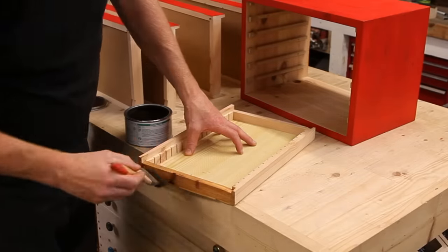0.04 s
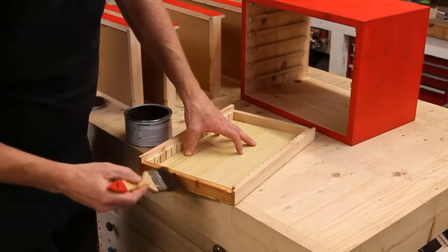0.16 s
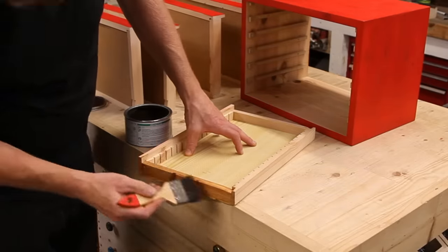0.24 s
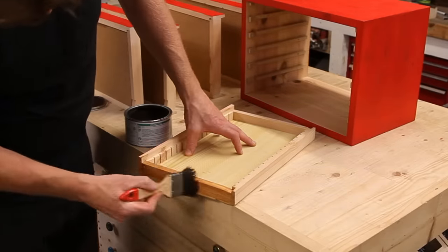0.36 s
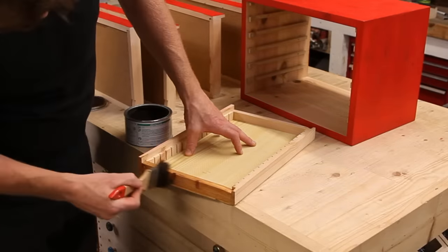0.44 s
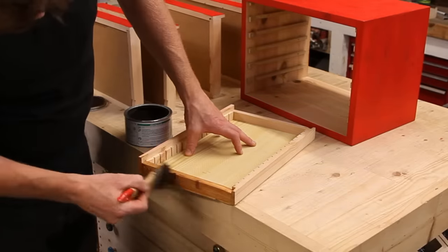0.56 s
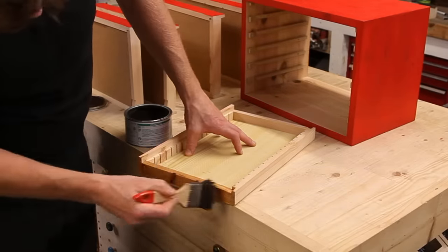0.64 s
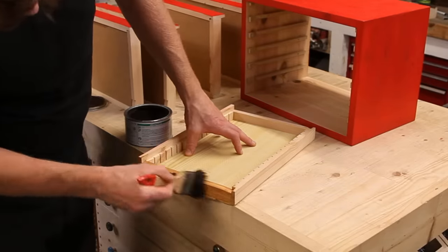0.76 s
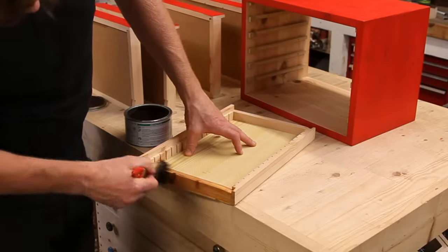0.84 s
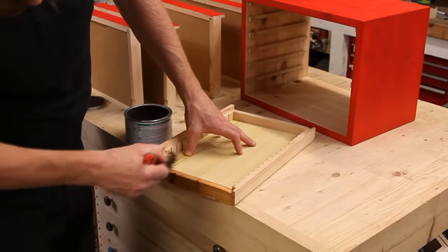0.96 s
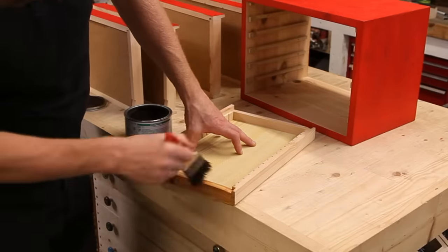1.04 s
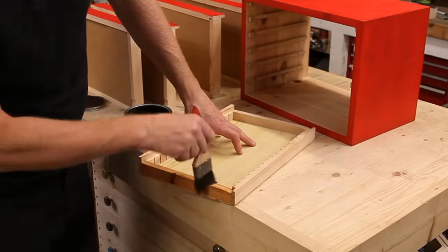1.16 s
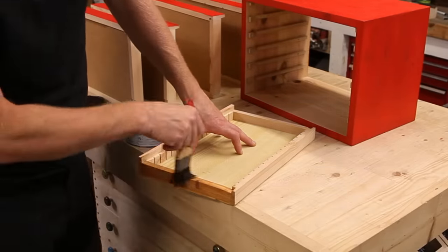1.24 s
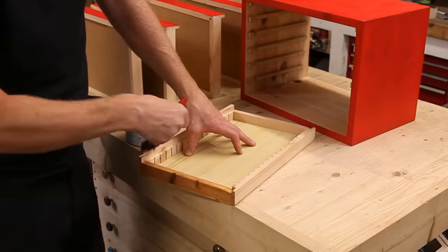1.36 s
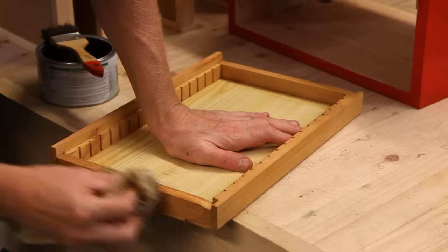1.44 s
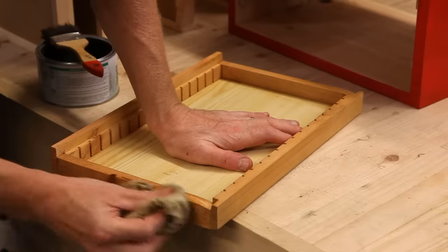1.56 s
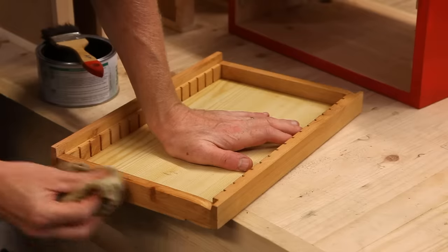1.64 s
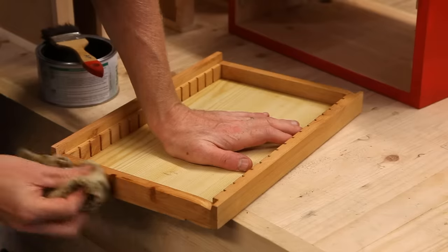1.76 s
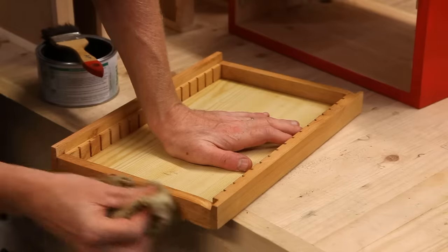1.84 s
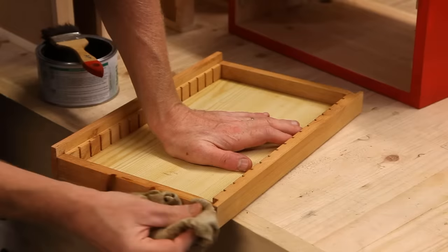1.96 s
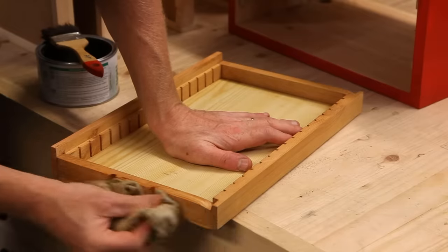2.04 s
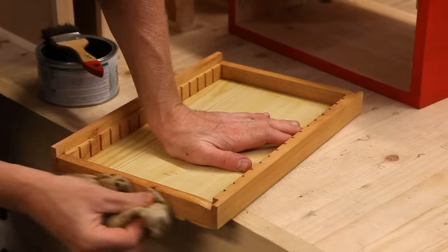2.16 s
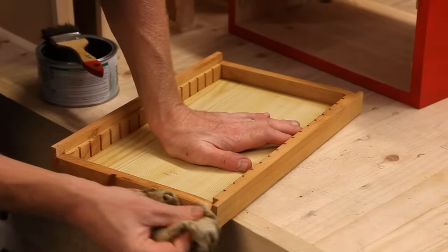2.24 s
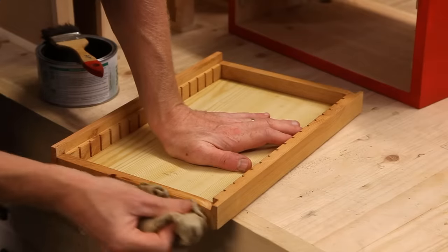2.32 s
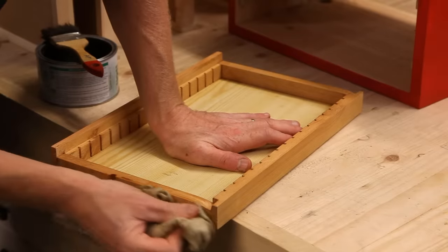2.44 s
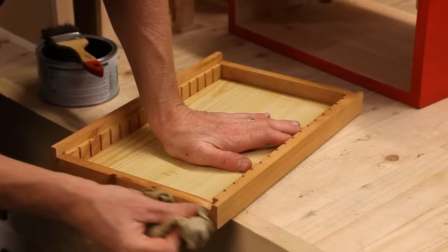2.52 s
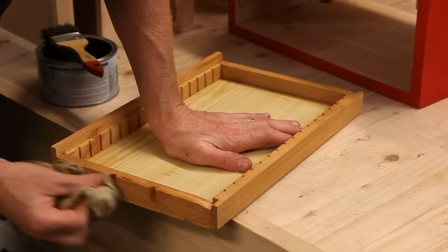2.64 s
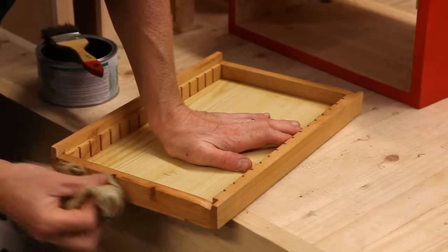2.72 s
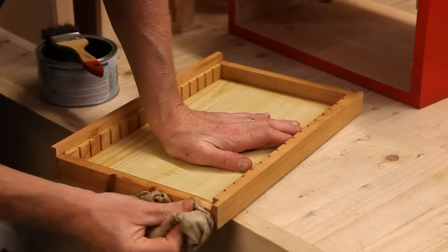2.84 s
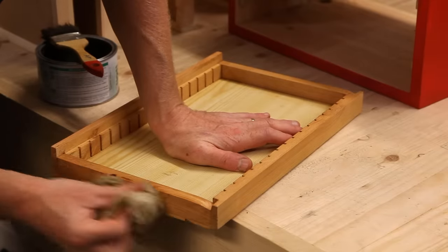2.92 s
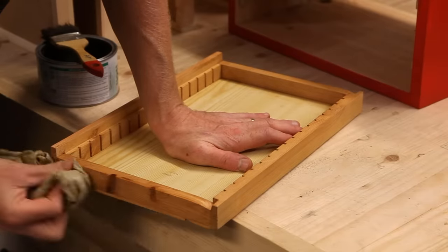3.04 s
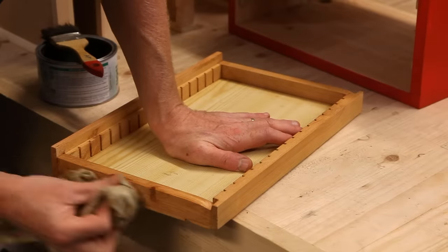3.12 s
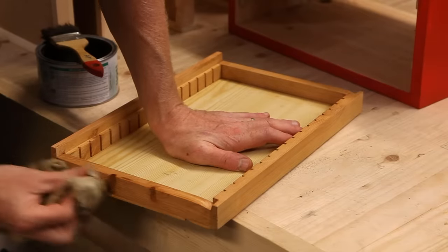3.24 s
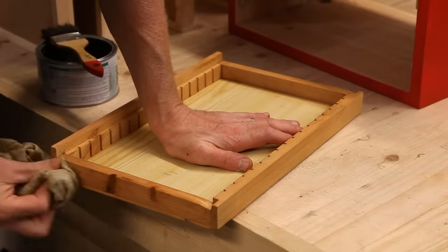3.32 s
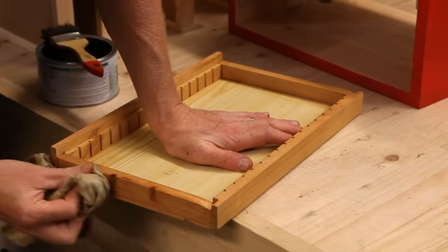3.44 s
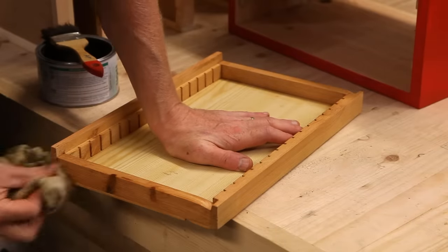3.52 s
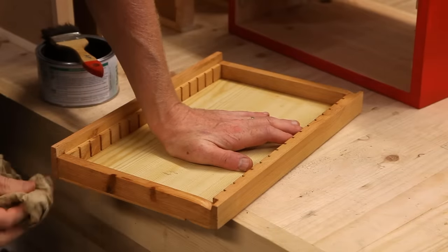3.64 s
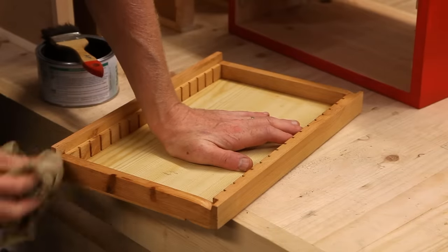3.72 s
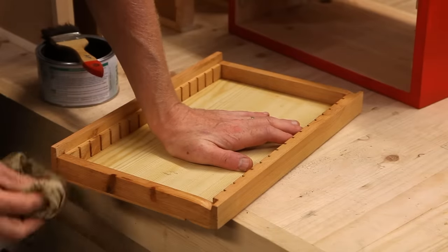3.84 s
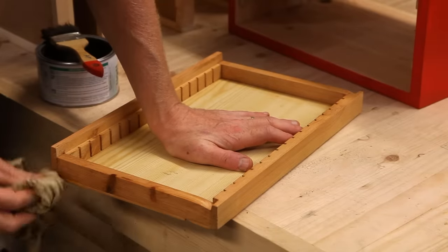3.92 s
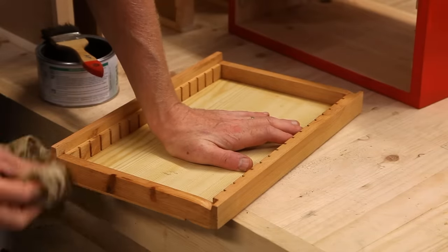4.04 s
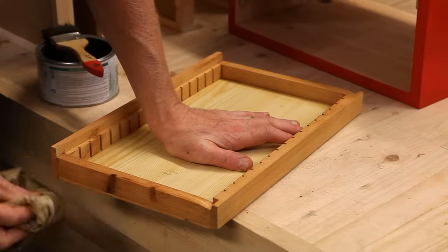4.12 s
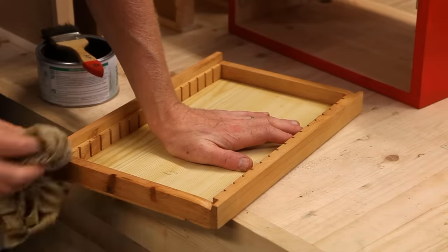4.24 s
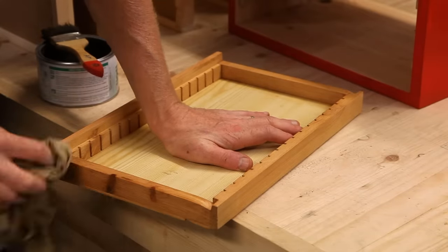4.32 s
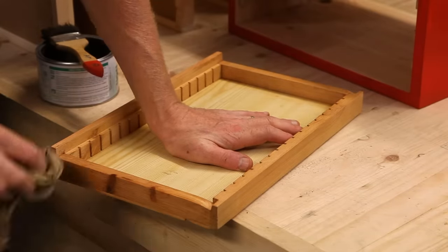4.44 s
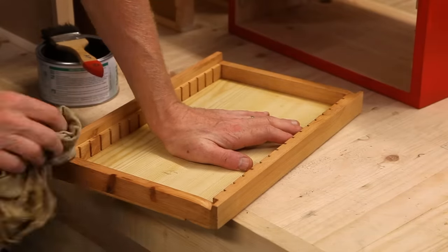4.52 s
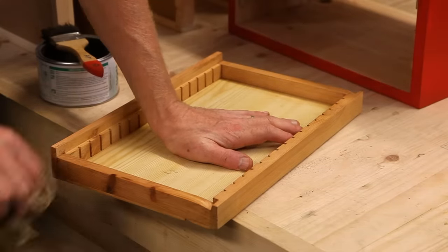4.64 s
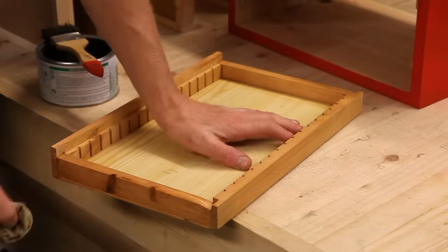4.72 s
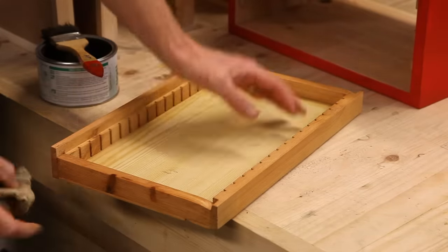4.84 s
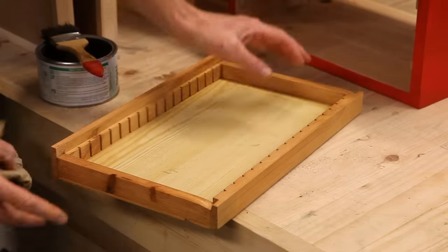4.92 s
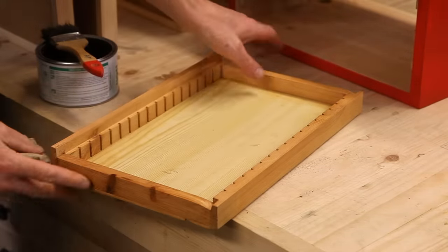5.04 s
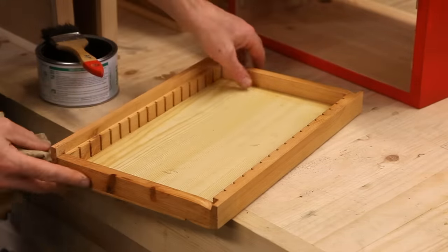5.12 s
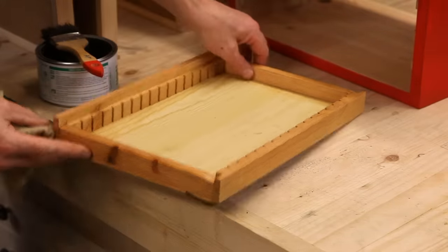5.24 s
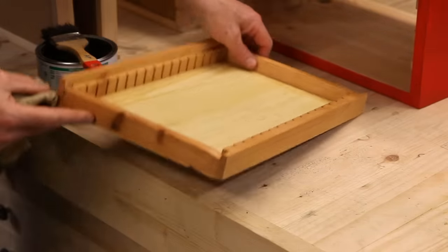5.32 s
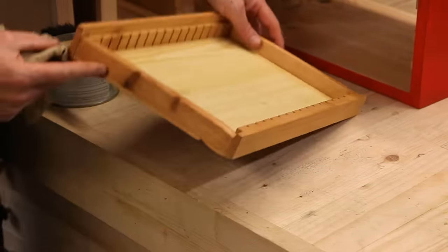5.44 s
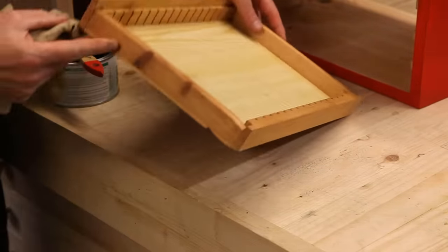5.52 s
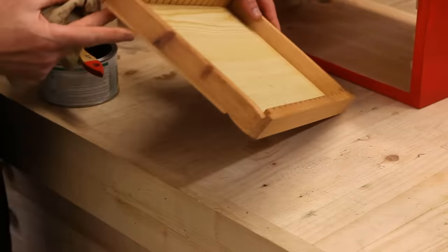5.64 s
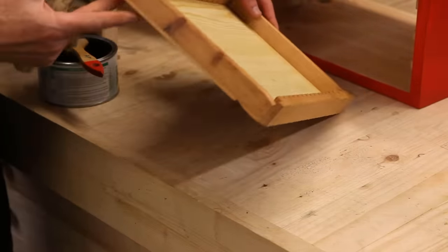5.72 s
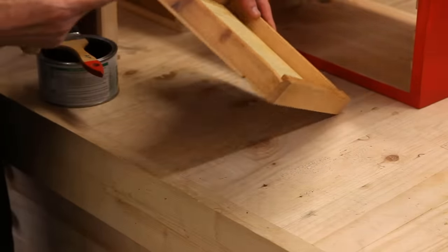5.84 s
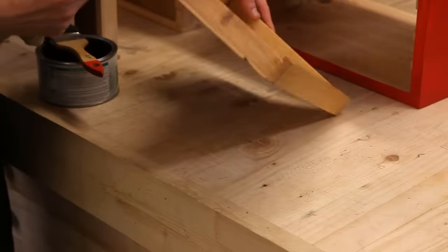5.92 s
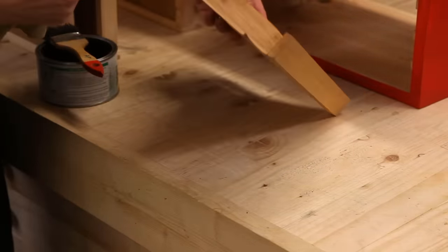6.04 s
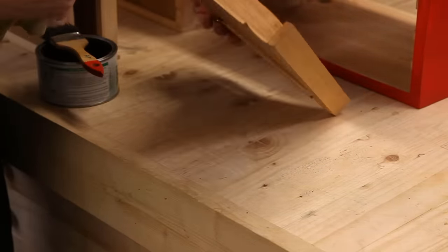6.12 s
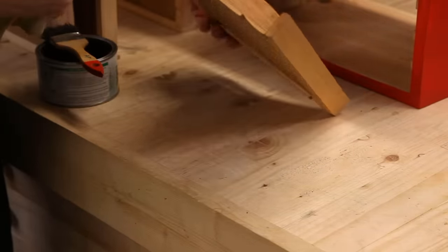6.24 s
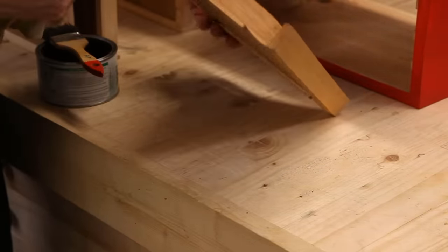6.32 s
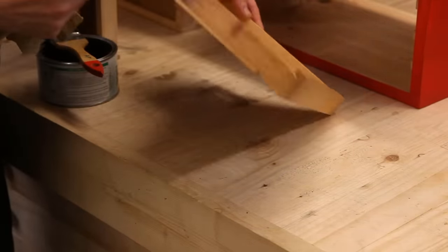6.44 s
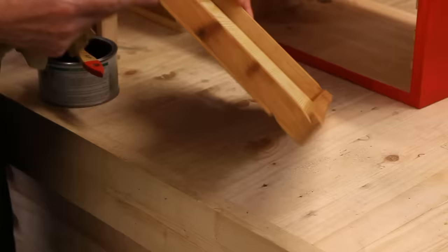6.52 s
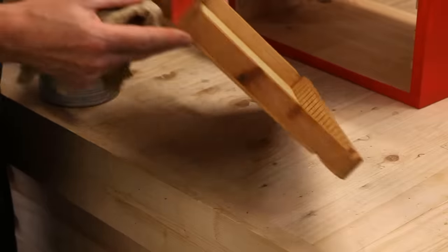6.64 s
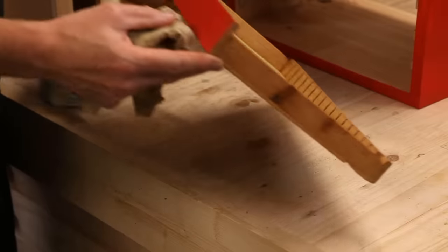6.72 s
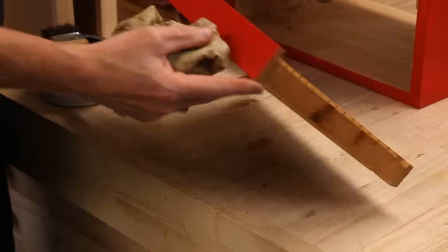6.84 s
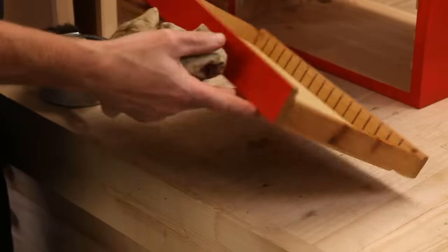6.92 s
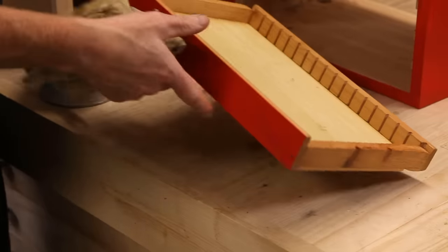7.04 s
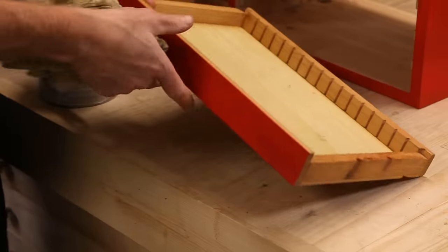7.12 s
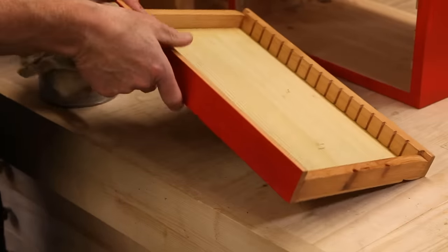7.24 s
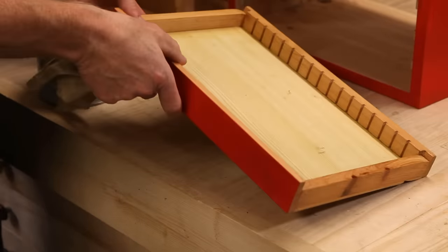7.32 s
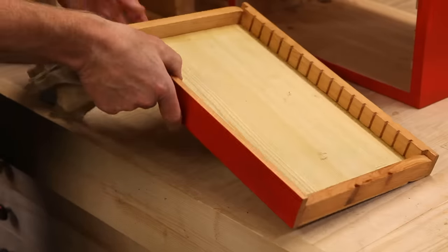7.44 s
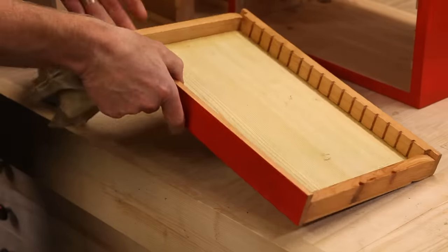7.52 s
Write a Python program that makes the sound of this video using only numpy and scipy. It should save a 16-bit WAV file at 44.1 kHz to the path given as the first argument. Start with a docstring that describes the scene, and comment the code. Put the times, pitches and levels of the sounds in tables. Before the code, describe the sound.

Soft brush strokes whisper on a small wooden drawer, then a rag rubs it in quick hissy strokes, with sharp knocks as it is turned over.

```python
"""Soft brush strokes hiss on a small wooden drawer, then a rag rubs it in quick strokes, among many knocks.
Later it is slid, lifted, turned and set down on its workbench. The hiss is filtered noise for fibres on
the grain; the same kind of rubbing noise shakes the side wall and bottom panel through their resonances.
Each knock is a bright crack that rings the same wood, and the bench groans low in narrow bands of noise.
A workshop adds echoes and a steady background, and one mono microphone picks it all up."""
import sys
import numpy as np
from scipy import signal
from scipy.fft import rfft, irfft
from scipy.io import wavfile
from scipy.ndimage import uniform_filter1d

SR = 44100
rng = np.random.default_rng(int(sys.argv[2]) if len(sys.argv) > 2 else 0)


def bounce(signal):
    """Save signal as a 16-bit WAV file at the path given by the first command-line argument."""
    frames = np.transpose(np.atleast_2d(signal))
    limited = np.clip(frames, -1, 1)
    pcm = np.round(limited * 32767).astype(np.int16)
    wavfile.write(sys.argv[1], SR, pcm)


N = 334278  # length in samples

# Moments when the hands change their hold on the drawer. Each entry: time in seconds.
GRIP_TIMES = [1.44, 4.27, 5.1, 6.4, 7.15]
PANEL_TOP_HZ, WALL_TOP_HZ = 900, 2700  # panel modes lie below the first, wall modes between the two


def undb(db):
    """Turns decibels into a plain gain."""
    return 10 ** (np.asarray(db) / 20)


def level(x, db):
    """Scales a sound to a chosen average (rms) level in dB."""
    return x * undb(db) / np.sqrt(np.mean(x ** 2))


def band(x, hz, *widths_hz):
    """Passes sound through one resonance per width, each with gain 1 at the centre."""
    for width_hz in widths_hz:
        x = signal.lfilter(*signal.iirpeak(hz, hz / width_hz, fs=SR), x)
    return x


def walk(rate):
    """Random wandering with spread 1: values held for 1 / rate seconds, then smoothed."""
    hold = int(SR / rate)
    steps = np.repeat(rng.standard_normal(N // hold + 1), hold)
    return level(uniform_filter1d(steps, hold)[:N], 0)


def rubbing():
    """Fibres stick and slip on the grain: we hear their hiss, and the wood that the rubbing shakes."""
    # Broad bands of the fibre hiss. Each row: centre in Hz, width in Hz, relative level in dB.
    hiss_bands = [(5270, 3200, -8), (7380, 3200, 0.5), (2960, 3530, -6), (13170, 3600, -5)]
    on_fibres, on_wall, on_panel = pressure()
    grip = np.searchsorted(GRIP_TIMES, np.arange(N) / SR)
    hiss = np.zeros(N)
    for hz, width_hz, db in hiss_bands:
        scratch = band(slips(2.3, 1.4, 90), hz, width_hz, 2.5 * width_hz)
        hiss += undb(db) * level(scratch, 0)
    drag = level(slips(1.66, 1.5, 60), 0)
    shove = level(slips(2.64, 2.0, 60), 0)

    thin = ring(drag * on_fibres, grip, WALL_TOP_HZ, SR, place_db=2.5)  # highest modes
    wall = ring(drag * on_wall, grip, PANEL_TOP_HZ, WALL_TOP_HZ, place_db=2.0)
    panel = ring(shove * on_panel, grip, 0, PANEL_TOP_HZ, place_db=1.5)
    # the shove also shakes the panel's higher modes around 1000 Hz
    panel = panel + level(band(shove, 1060, 420, 420), -8.0) * on_panel
    # many weak modes merge into a broad rustle between the strong ones
    wall = undb(-6.5) * wall + level(band(drag, 2040, 2400, 2400), -11) * on_wall
    panel = undb(-4.5) * panel + level(band(shove, 420, 1040, 1040), -12) * on_panel
    return level(hiss, -0.96) * on_fibres + undb(-1.0) * thin + wall + panel


def pressure():
    """Gains on fibres, wall and panel: each contact lands, presses down, travels, lifts and fades."""
    # Brush strokes, rag strokes, and drawer or fingers sliding on wood. Each row: start in seconds, length
    # in seconds, hiss gain in dB on landing (before the touch shortfall), hiss gain in dB on lifting,
    # side wall in dB compared with the hiss, bottom panel in dB compared with the hiss.
    brush_strokes = [(0.0, 0.085, -48.5, -57, -4, 0), (.312, 0.14, -41.5, -36.5, -4.5, -13),
                     (.724, 0.12, -41.5, -36.5, -5, -13), (1.088, 0.021, -38.5, -38, -6, -21),
                     (1.192, 0.11, -40, -36, -4.5, -16)]
    rag_strokes = [(1.442, 0.07, -33.5, -37, -3.5, -28), (1.56, .15, -38, -35.5, -5, -16),
                   (1.756, .19, -35.5, -34.5, -6, -16), (1.978, 0.047, -35.5, -41, 0, -9),
                   (2.036, 0.071, -31.5, -30, -7, -5), (2.156, 0.13, -32, -32.5, -8.5, -17),
                   (2.327, 0.049, -29.5, -33.5, -5, -8), (2.426, 0.069, -32.5, -35.5, -5, -8),
                   (2.541, 0.13, -29, -30, -10, -13), (2.716, 0.13, -32, -30.5, -8.5, -16),
                   (2.872, .15, -26, -33, -4.5, -10), (3.068, 0.1, -32, -35, -21, -11.5),
                   (3.198, 0.11, -35, -30, -12.5, -16.5), (3.344, .08, -31.5, -37, -13, -10),
                   (3.456, 0.1, -38.5, -27.5, -8, -10.5), (3.606, 0.014, -30, -30.5, -2, -22),
                   (3.713, 0.03, -20.5, -22, -3.5, -8.5), (3.78, 0.08, -33.5, -33, -6, -8),
                   (4.048, 0.026, -25.5, -28, -6, -11), (4.316, 0.038, -38.5, -29, -6, -0.5),
                   (4.588, 0.037, -36.5, -29, -23, -12)]
    wood_slides = [(.522, 0.16, -65.5, -64.5, 1, 21.5), (1.404, 0.029, -48.5, -48.5, -8, 7),
                   (4.28, .02, -42, -48, -9, -10), (4.555, .025, -39, -55, -6, -12),
                   (5.15, .02, -50, -53, -8, -7), (5.174, 0.017, -40.5, -49, 2, -15),
                   (5.336, .24, -45, -48.5, -0.5, -7.5), (6.29, 0.048, -55, -50, -9, -15),
                   (6.416, 0.087, -58, -57.5, 3.5, 4.5), (6.508, 0.045, -45, -45.5, 2.5, -8),
                   (6.6, 0.16, -47, -42, -0.5, -10.5), (6.796, .01, -39.5, -44.5, -10, -2.5),
                   (6.85, 0.092, -49, -50, -1.5, -11), (6.955, 0.032, -43, -42, -5, -28)]
    # Faint rustle of hands and rag between contacts. Each row: time in seconds, hiss gain in dB,
    # side wall in dB compared with the hiss, bottom panel in dB compared with the hiss.
    faint_rustle = [(0.0, -54, -4, 1), (.24, -57, -8, 2), (.6, -72, -4, -3), (1.0, -60.5, -7, -10),
                    (1.39, -57, -2, -10), (1.55, -45, -2, 0), (3.6, -55, 11, -9), (4.0, -48, -5, -5.5),
                    (4.26, -56.5, -1, -13), (4.5, -53, -3.5, -6), (4.67, -42.5, -6, -4),
                    (5.05, -52.5, -4.5, -13), (5.3, -53, -6, -9), (5.75, -62, -1, 2), (6.1, -70, -7, -2.5),
                    (6.4, -63, -2.5, -14), (7.13, -63, -12, -12), (7.24, -48, -2.5, -3),
                    (7.58, -60.5, -5, -12)]
    # Touch of each tool: dB short of full pressure at first, pressing time in s, fade after lifting in dB/s.
    tools = [(brush_strokes, (2.2, 0.022, 280)),
             (rag_strokes, (2.4, 0.01, 570)),
             (wood_slides, (2.8, 0.022, 350))]
    landing_s = 0.006
    fade_share = np.array([[1], [0.63], [0.44]])  # wall and panel fade slower: the wood goes on shaking

    t = np.arange(0, N / SR, 0.001)
    s, hiss_db, wall_db, panel_db = np.transpose(faint_rustle)
    power = np.array([undb(2 * np.interp(t, s, hiss_db + db)) for db in (0, wall_db, panel_db)])
    for rows, (short_db, press_s, fade_db_s) in tools:
        for start, length, land_db, lift_db, wall_db, panel_db in rows:
            since = np.maximum(t - start, 0)
            lifted = np.maximum(since - length, 0)
            db = np.interp(since, [0, length], [land_db, lift_db])
            db = db - short_db * np.exp(-since / press_s)
            db = db + np.array([[0], [wall_db], [panel_db]]) - fade_share * fade_db_s * lifted
            landing = np.clip(1 + (t - start) / landing_s, 0, 1)
            power += undb(2 * db) * landing ** 2
    return [np.interp(np.arange(N) / SR, t, np.sqrt(p)) for p in power]


def slips(scatter_db, flicker_db, rate):
    """Dense stick-slip of many fibres: clicks of uneven size under an unsteady hand."""
    uneven_db = scatter_db * rng.exponential(size=N)
    hand_db = flicker_db * walk(rate)
    return rng.standard_normal(N) * undb(uneven_db + hand_db)


def ring(force, grip, lo_hz, hi_hz, place_db=0):
    """Rings the drawer modes between two frequencies; the grip decides how strongly each can ring."""
    # Natural resonances of the drawer, with the bench shaking low beneath it in the first row. Each row: pitch
    # in Hz, # width in Hz, then the level in dB (rms for a steady push of unit noise) when brushed, pressed
    # under the rag, # dabbed at the corner, tilted up, turned over, set down.
    modes = [(45, 28, -27, -19.5, -33, -25, -30, -33), (96.7, 12, -12.5, -20.5, -9.5, -30, -24, -40),
             (147.4, 36, -16, -17, -9, -20, -24, -11.5), (209.4, 16, -16, -20, -17, -20, -35, -8.5),
             (247, 26, -20, -20.5, -9, -6, -26, -7.5), (319.6, 17.3, -17.5, -8.5, -5, -4.5, -10.5, -13.5),
             (360, 106, -36, -7.5, -10.5, -26, -14, -21), (426, 25, -6.5, -5, -5.5, -5, -12, -13),
             (475.7, 18, -17, -17.5, -7, -10, -30, -13.5), (557, 28, -11.5, -11.5, -14, -3, 1, 1),
             (660, 39, -5.5, -6, -9.5, -7, -9.5, -11), (827, 39, -5, -7, -11, -3.5, -9, -9.5),
             (985, 63, -11.5, -13, -9, -6.5, -10.5, -7), (1196, 125, -13.5, -7.5, -9, -8.5, -12, -5),
             (1524, 54, -16, -13.5, -9, -8, -6.5, -8.5), (1686, 77, -3.5, -5.5, -3, -6.5, -5, -8),
             (2080, 270, -2.5, -4, -6.5, -20, -16, -3), (2110, 117, -26, 0.5, -16, -12, -15, -12.5),
             (2615, 250, -18, -4, -7, -1.5, -1, -6), (2790, 470, -22, -18, -14, -9.5, -10, -28),
             (2974, 41, -19.5, -24, -15, -24, -10, -26), (3670, 220, -15, -23, -23, -18, -12, -21),
             (3946, 170, -10, -19, -19, -20, -12, -24), (4800, 1100, -40, -17, -9.5, -11, -7, -2.5)]
    total = 0
    for k, (hz, width_hz, *grip_db) in enumerate(modes):
        if lo_hz <= hz < hi_hz:
            # a moving contact crosses still points of the mode, so each one swells and fades on its own
            place = undb(place_db * walk(7)[:len(force)])
            push = force * undb(grip_db)[grip] * place
            # the root makes up for the noise power lost in a narrow band; signs alternate
            total = total + (-1) ** k * band(push, hz, width_hz) * np.sqrt(SR / (np.pi * width_hz))
    return total


def top(x):
    """Scales a sound to a peak of 1."""
    return x / np.max(np.abs(x))


def knocks():
    """Each blow: a click with a short bright crack, and a push into the modes of wall and panel."""
    # Blows on the wood. Each row: start in seconds, crack peak in dB, panel ring in dB compared with
    # that peak, side wall ring in dB compared with that peak, crack centre in Hz, then the times in
    # seconds for the crack noise and for the contact noise to fall by 60 dB.
    blows = [(0.3114, -42, -5, -6, 2100, 0.014, 0.046), (0.522, -34.5, -1.5, -10, 3650, 0.0086, 0.024),
             (0.725, -34, -17, -5, 2100, 0.018, 0.034), (0.7692, -38, 1.5, 4, 7460, .015, 0.031),
             (2.0572, -16.5, -6, -4.5, 3950, 0.037, 0.08), (2.5413, -21, -18, -20, 1200, 0.05, 0.042),
             (2.5746, -21, -9.5, -6.5, 5260, 0.012, 0.015), (2.8659, -2, -26.5, -16, 5060, 0.03, 0.049),
             (3.3449, -18, -22, -12, 7510, .015, 0.035), (3.7174, -16, -19, -26, 1580, 0.26, 0.04),
             (4.315, -26, -18, -21, 7290, 0.022, 0.39), (4.6116, -26.5, -0.5, -17, 5900, .02, 0.094),
             (4.7772, -25, -33, -13, 7350, 0.013, 0.027), (5.1725, -40.5, -22, 1, 6650, .02, 0.03),
             (5.8586, -7, -52, -34, 6000, 0.0093, 0.03), (6.508, -35.5, -26, -20, 2900, 0.079, 0.066),
             (6.8108, -44, 3, -10, 4410, .02, 0.066), (7.1564, -8, -9.5, -9, 5360, 0.045, 0.19),
             (7.3096, -27.5, -18, -10, 6000, .03, 0.057), (7.4495, -28.5, -30, -27, 6160, 0.0072, 0.031)]
    out = np.zeros(N + SR)
    t = np.arange(SR // 2) / SR
    grit = rng.standard_normal((len(blows), len(t)))
    for (s, db, panel_db, wall_db, hz, crack_t60, contact_t60), noise in zip(blows, grit):
        grip = np.searchsorted(GRIP_TIMES, s)
        crack = noise * 1000. ** (-t / crack_t60)
        crack[0] = 5.1  # the click
        # uneven contact shares the blow out among the modes
        rattle = noise[::-1] * 1000. ** (-t / contact_t60)
        blow = top(band(crack, hz, 0.99 * hz, 2.0 * hz, 2.85 * hz))
        blow = blow + undb(wall_db) * top(ring(rattle, grip, PANEL_TOP_HZ, WALL_TOP_HZ))
        blow = blow + undb(panel_db) * top(ring(rattle, grip, 0, PANEL_TOP_HZ))
        # the bench top answers dully
        blow = blow + undb(panel_db - 12) * top(band(rattle, 770, 1000, 1000))
        i = int(s * SR)
        out[i:i + len(t)] += undb(db) * blow
    return out[:N]


def bench():
    """Weight shifting on the bench stirs its resonances, sometimes two together, as soft bumps and groans."""
    # Bumps and groans of the bench top. Each row: start in seconds, length in seconds,
    # rms level in dB at full push, pitch in Hz, width in Hz.
    groans = [(0.373, 0.044, -58, 144, 50), (0.798, .04, -55, 144, 50), (1.138, 0.043, -56, 139, 50),
              (2.419, 0.038, -44, 430, 200), (3.552, 0.047, -43.5, 418, 250), (4.293, 0.12, -53, 115, 80),
              (4.586, 0.17, -54, 111, 80), (5.186, 0.037, -56, 120, 60), (5.478, 0.244, -55.5, 241, 40),
              (5.486, .14, -57, 321, 40), (5.95, 0.11, -61, 233, 60), (6.431, 0.087, -56.5, 146, 50),
              (6.848, .05, -59, 690, 60), (7.355, .2, -62.5, 203, 70)]
    edge_s = 0.022  # time to swell in and to die away
    out = np.zeros(N + SR)
    t = np.arange(SR) / SR - 0.5  # starts early to leave room for the swell
    for start, length, db, hz, width_hz in groans:
        push = np.clip(np.minimum(t, length - t) / edge_s + 0.5, 0, 1)
        shake = level(band(rng.standard_normal(SR), hz, width_hz, 2 * width_hz), db)
        i = int(start * SR)
        out[i:i + SR] += push * shake
    return out[SR // 2:SR // 2 + N]


def workshop(x):
    """Two near echoes, and a diffuse tail that swells in and dies a little faster in the treble."""
    # Echoes off bench and cabinet. Each row: delay in seconds, level in dB compared with the direct sound.
    near_echoes = [(.0056, -13), (.0145, -17)]
    tail_db, swell_s = -7, 0.012
    low_t60_s, high_t60_s = 0.39, 0.37  # time to fall by 60 dB
    t = np.arange(int(0.7 * SR)) / SR
    noise = rng.standard_normal(len(t))
    low = signal.lfilter(*signal.butter(2, 1000, fs=SR), noise)
    tail = low * 1000. ** (-t / low_t60_s) + (noise - low) * 1000. ** (-t / high_t60_s)
    tail = tail * (1 - np.exp(-(t / swell_s) ** 2))
    tail = undb(tail_db) * tail / np.sqrt(np.sum(tail ** 2))
    tail[0] = 1  # the direct sound
    for s, db in near_echoes:
        tail[int(s * SR)] += undb(db)
    return signal.fftconvolve(x, tail)[:N]


def room_tone():
    """Steady background of the shop and hiss of the preamp: noise shaped by a smooth spectrum."""
    # Shape of the background. Each row: frequency in Hz, relative level in dB per Hz.
    spectrum = [(12, -37), (20, -8), (162, -5), (496, -9.5), (554, -8.5), (620, -10), (1080, -12),
                (1350, -11.5), (2240, -12.5), (2720, -11), (2960, -12.5), (7860, -13.5), (8550, -18),
                (15800, -23.5)]
    hz, db = np.transpose(spectrum)
    f = np.maximum(np.arange(N // 2 + 1) * SR / N, 1)
    shape = undb(np.interp(np.log(f), np.log(hz), db))
    return level(irfft(rfft(rng.standard_normal(N)) * shape, N), -56.5)


def scene():
    """Everything reaches one microphone, whose sound goes equally to both channels."""
    near = workshop(rubbing() + knocks() + bench())
    # the capsule dulls the top and drops the deepest bass
    near = signal.sosfilt(signal.butter(3, 8870, fs=SR, output="sos"), near)
    near = signal.sosfilt(signal.butter(2, 40, "high", fs=SR, output="sos"), near)
    return np.tile(near + room_tone(), (2, 1))


def record(dry):
    """A steep low-pass filter removes the treble above 15830 Hz."""
    return signal.sosfilt(signal.ellip(10, 0.2, 60, 15830, fs=SR, output="sos"), dry)


dry = scene()
out = record(dry)
bounce(out)
```